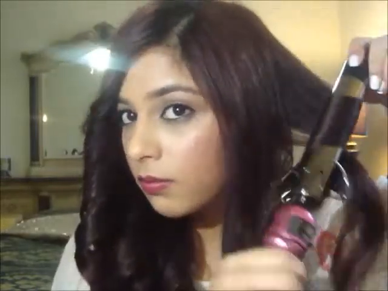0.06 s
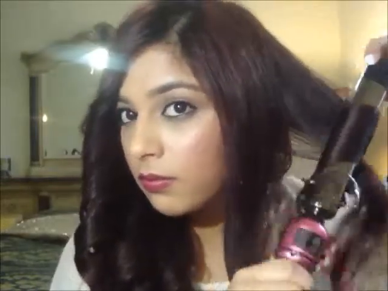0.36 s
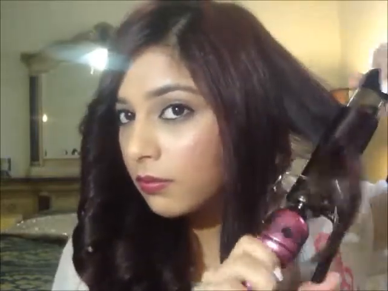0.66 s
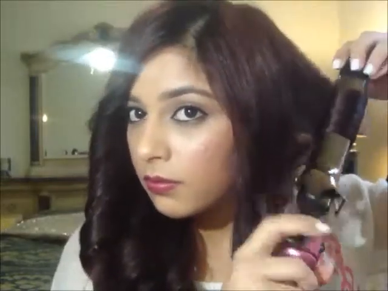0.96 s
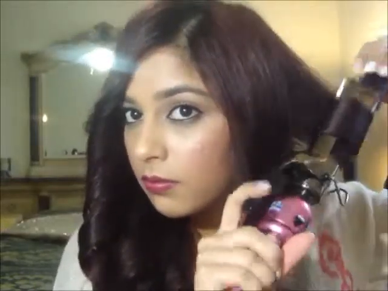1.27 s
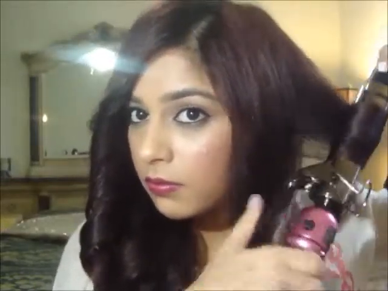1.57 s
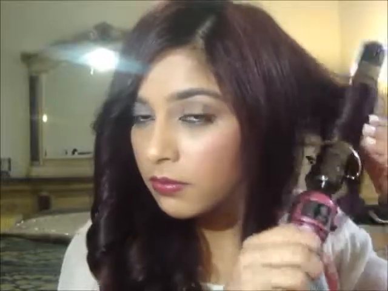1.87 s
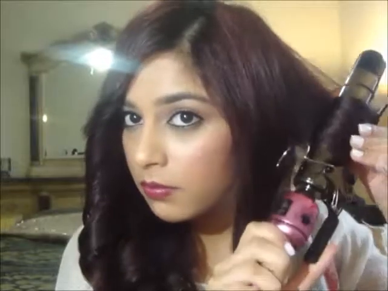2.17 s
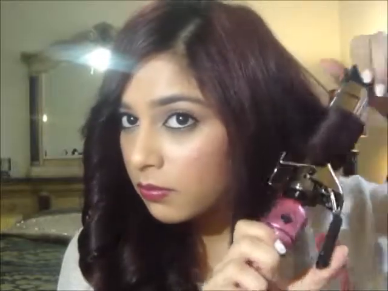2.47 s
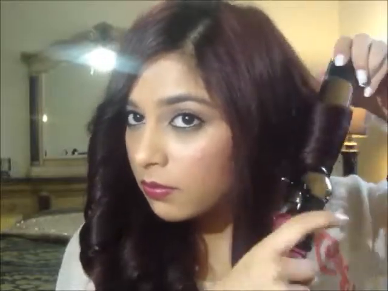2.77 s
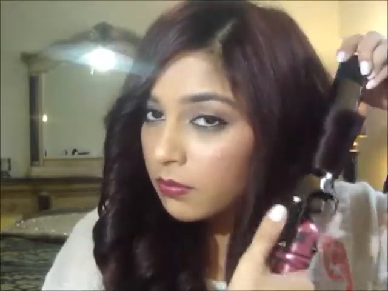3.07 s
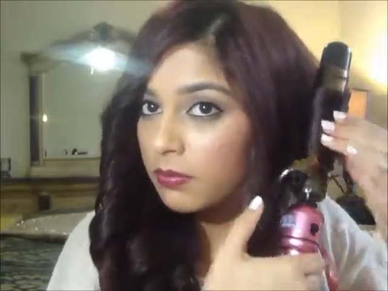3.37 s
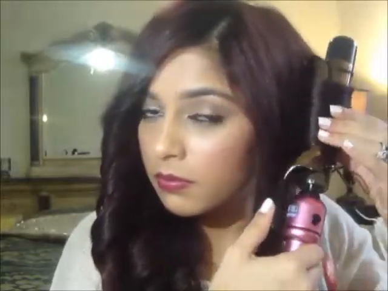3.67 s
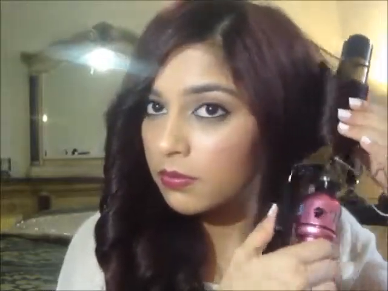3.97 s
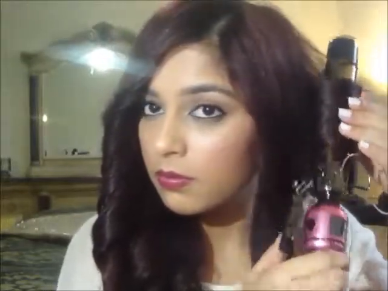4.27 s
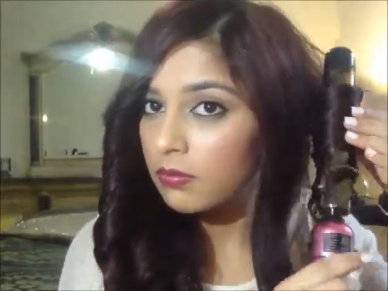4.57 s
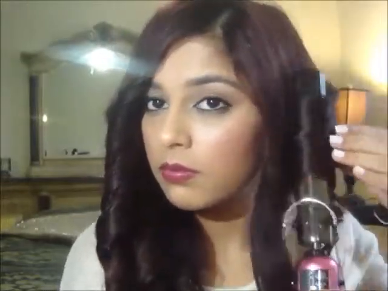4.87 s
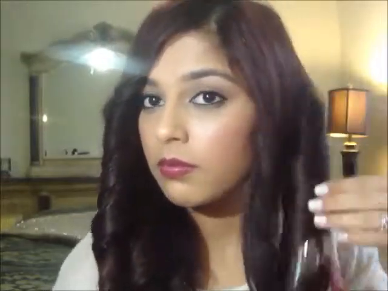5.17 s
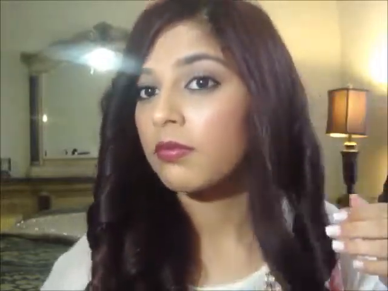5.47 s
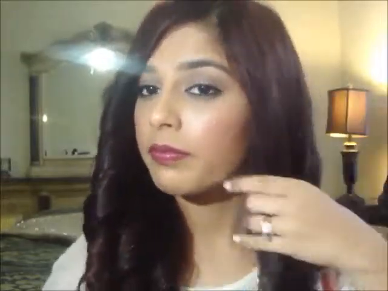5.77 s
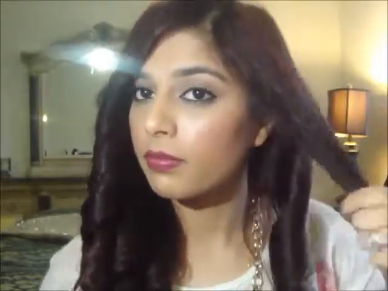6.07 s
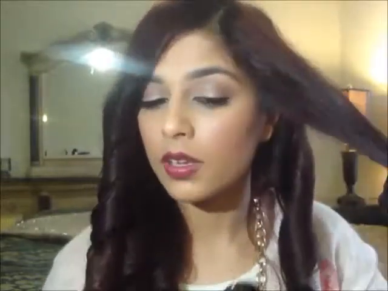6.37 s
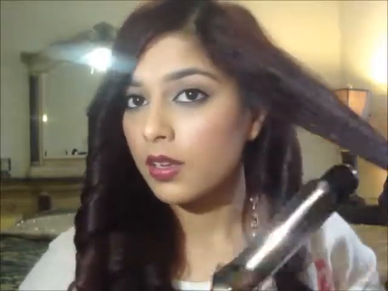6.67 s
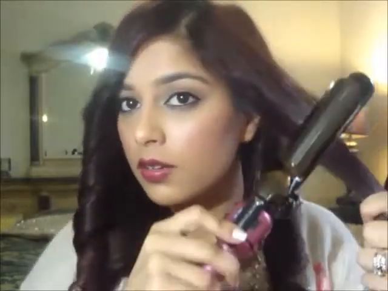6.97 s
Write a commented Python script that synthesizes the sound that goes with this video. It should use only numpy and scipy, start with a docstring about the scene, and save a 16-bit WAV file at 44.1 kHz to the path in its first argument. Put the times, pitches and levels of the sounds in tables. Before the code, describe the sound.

A fan's soft, steady rush and faint microphone hiss fill a quiet room for all seven seconds. During the first second, hair rustles lightly as it is wound on a curling iron. From about 0.3 seconds, the sprung metal clamp gives scattered light ticks and short, thin scrapes against the barrel. These thicken around 1.8 to 2.3 seconds, with a tiny, very high hinge squeak near 2.1. Sparse ticks follow. Between 3.8 and 4.3 seconds come several sharp, brief squeaks, the loudest moments, then quick scrapes and clicks continue until 5.4. At 5.6 the clamp snaps shut with a short, bright ring, and another sharp click lands at 5.8. A last cluster of scrapes and ticks comes around 6.5 to 6.8 seconds. The iron is close to a small stereo microphone, slightly right, and near walls answer briefly.

```python
"""A fan's steady rush and faint microphone hiss in a quiet room, then a light rustle of hair.
It is being wound on a hot curling iron, close to a small stereo microphone and a little to the right.
The sprung metal clamp rubs on the barrel in short scrapes, friction makes its hinge squeak high,
and it ticks and once snaps shut. Near walls answer briefly."""
import sys
import numpy as np
from scipy import signal
from scipy.fft import rfft, irfft, next_fast_len
from scipy.io import wavfile

SR = 44100
rng = np.random.default_rng(int(sys.argv[2]) if len(sys.argv) > 2 else 0)


def master_out(mix):
    """Clip the mix to full scale and print it as 16-bit PCM to the path in sys.argv[1]."""
    frames = np.transpose(np.atleast_2d(mix))
    ceiling = np.clip(frames, -1, 1)
    pcm = np.round(ceiling * 32767).astype(np.int16)
    wavfile.write(sys.argv[1], SR, pcm)


N = 310023
T = np.arange(N) / SR

# The hinge catching and singing: t/s, f/Hz, level/dB, swell/s, hold/s, left minus right/dB,
# lift of the other hinge modes/dB, fullness of the grinding/dB
HINGE_SQUEAKS = [(1.2, 12830, -26.5, 0.0015, 0.0025, -1, -2, 6),
                 (1.985, 12040, -29.5, 0.0014, .002, -4, 0, -2),
                 (2.0686, 14100, -11.5, 0.0026, 0.0034, -7, -10, 0.5),
                 (2.6796, 12450, -27, 0.00044, .0018, -2, 12, -4),
                 (2.7582, 12500, -37.5, .0008, .002, -2, 14, -4),
                 (3.798, 12315, -8.5, 0.0015, 0.0015, -5.5, 0, -9),
                 (3.952, 12370, -8.5, 0.0018, 0.0076, -1.5, -5, -6),
                 (3.968, 12400, -16, 0.0014, .003, 2, 0, -4),
                 (4.116, 12340, -18, 0.0027, 0.0018, -3, 9.5, 4),
                 (4.261, 12360, -9.5, 0.0042, .005, -4, -1, -6),
                 (4.278, 12446, -18.5, 0.0021, .003, -4, 5, 6), (4.957, 12456, -28, .002, .002, -2, 10, 4)]


def amp(db):
    """Decibels to gain."""
    return 10 ** (np.asarray(db) / 20)


def unit(x):
    """Scale to rms 1."""
    return x / np.sqrt(np.mean(x ** 2))


def colour(x, points, bumps=()):
    """Filter by a curve of (f/Hz, level/dB) with bell-shaped peaks or dips (f/Hz, width/Hz, lift/dB)."""
    size = next_fast_len(x.shape[-1])
    f = np.maximum(np.fft.rfftfreq(size, 1 / SR), 1)
    hz, db = np.transpose(points)
    curve = np.interp(np.log(f), np.log(hz), db)
    for centre, width, lift in bumps:
        curve = curve + lift * np.exp(-.5 * ((f - centre) / width) ** 2)
    return irfft(rfft(x, size) * amp(curve), size)[..., :x.shape[-1]]


def fade(t, t60):
    """Free decay, 60 dB in t60 seconds."""
    return np.exp(-np.log(1000) * np.maximum(t, 0) / t60)


def wobble(size, rate):
    """Random drift with spread near 1, changing course rate times a second."""
    return np.interp(T[:size] * rate, np.arange(4096), rng.standard_normal(4096))


def pan(db):
    """Left and right gains for a level difference, left minus right."""
    return amp(np.array([[db], [-db]]) / 2)


def add(track, start, x):
    """Mix a sound into a track from a given time."""
    i = int(start * SR)
    size = min(x.shape[-1], N - i)
    track[..., i:i + size] += x[..., :size]


def microphone_hiss(level_db=-58):
    """The microphone's own even hiss, mostly high treble."""
    noise = rng.standard_normal((2, N))
    return amp(level_db) * unit(colour(noise, [(3000, -37), (14000, -10), (15500, -19)]))


def fan_rush(mid_db=-44.24, side_db=1.85, waver_db=0.86):
    """The fan's diffuse rush fills the room, slightly stronger in the side signal than in the mid."""
    # Room tone: f/Hz, relative level/dB
    room_tone = [(15, -88), (25, -66), (165, -24), (234, -15), (314, -9), (400, -6.5), (539, -6), (705, -2),
                 (764, -1), (1000, -3), (1240, -4.5), (3020, -9.5), (5310, -13.5), (15600, -23.5)]
    # Peaks and a dip on the room tone: f/Hz, width/Hz, lift/dB
    # The rows below 2 kHz are the fan's resonances.
    # The last row is a narrow dip in the hiss near 14 kHz.
    peaks_and_dip = [(240, 10, 4), (361, 46, 3.5), (645, 34, 2), (852, 18, 3), (916, 21, 3.5),
                     (1124, 26, 5.5), (1246, 22, 5.5), (1750, 103, 2), (14100, 120, -4)]
    mid, side = colour(rng.standard_normal((2, N)), room_tone, peaks_and_dip)
    side = colour(unit(side), [(200, 0.66), (800, side_db), (3000, side_db), (8000, 0.97)])
    rush = unit(mid) + side * np.array([[1], [-1]])
    return rush * amp(mid_db + waver_db * wobble(N, rate=4.73))


def fan_motor(gain_db=-2, wander=0.003, flutter_db=2.5):
    """The motor's faint tones wander a little and reach each side by different paths."""
    # Motor tones: f/Hz, level/dB before gain_db
    tones = [(240, -69), (413, -68.5), (748.3, -61), (932, -65.5), (1130, -67), (1266, -66)]
    out = np.zeros((2, N))
    for hz, db in tones:
        turns = np.cumsum(hz * (1 + wander * wobble(N, rate=8.3))) / SR
        for side in range(2):
            peak = np.sqrt(2) * amp(db + gain_db + flutter_db * wobble(N, rate=6))
            out[side] += peak * np.sin(2 * np.pi * (turns + rng.random()))
    return out


def room(x, slap_db=-24, slap_s=.015, size=16000):
    """Head and hands scatter the sound at once, walls a moment later; furniture soon swallows it."""
    # Head and hands, walls, late tail: level/dB, t60/s, delay/s
    reflections = [(-8, 0.059, .0005), (-10, 0.16, 0.007), (-17, 0.28, 0.007)]
    t = T[:size]
    response = np.zeros((2, size))
    for db, t60, delay in reflections:
        echoes = rng.standard_normal((2, size)) * (t > delay) * fade(t - delay, t60)
        response += amp(db) * unit(echoes) / np.sqrt(size)
    # one bare wall sends back a distinct echo
    for side, lag in enumerate(slap_s + 0.0004 * rng.random(2)):
        response[side, int(lag * SR)] += amp(slap_db)
    return x + signal.fftconvolve(x, response, axes=1)[:, :N]


def clamp_ring(force, scatter_db=3.5, detune=0.0054, spread_turns=0.14, size=4096):
    """The metal rings under a force; the place of contact weights its modes."""
    # Modes of clamp and barrel: f/Hz, t60/s, relative level/dB
    modes = [(5500, 0.039, -13), (6540, 0.013, -6), (6880, 0.023, 3.5), (7270, 0.024, -1),
             (7500, 0.022, -7), (8340, 0.025, 1.5), (8570, 0.029, -7), (10140, 0.014, -4.5),
             (10730, 0.035, -8), (11050, 0.029, -1), (11600, 0.027, -4), (12400, 0.027, 4.5),
             (12770, 0.0077, 5.5), (13940, .02, 4), (14440, 0.024, -5)]
    hz, t60, db = np.transpose(modes)[..., None]
    weight, shift, phase, skew = rng.standard_normal((len(modes), 4)).T[..., None]
    t = T[:size]
    turns = hz * (1 + detune * shift) * t + phase
    strength = amp(db + scatter_db * weight) * fade(t, t60) / np.sqrt(t60)
    # each mode radiates a little differently to left and right
    sides = [strength * np.sin(2 * np.pi * (turns + side * spread_turns * skew)) for side in (1, -1)]
    response = unit(np.sum(sides, axis=1)) / np.sqrt(size)
    return signal.fftconvolve(force[None], response, axes=1)[:, :len(force)]


def rub(length, db, body_db, treble_db, spots, bite_db, slips_per_s=11000, grip_db=3, ring_db=-2,
        spot_width_hz=290, glide=0.013, attack_s=0.0024, release_t60=0.0086, size=8000):
    """One stroke: dense uneven slips hiss at the contact and ring the clamp."""
    # Colour of sliding contact: f/Hz, gain/dB
    sliding = [(80, -64), (300, -42), (1200, -42), (2500, -2), (4700, -2.5), (7000, 5), (9500, -0.5),
               (12500, 0), (16000, 3.5)]
    t = T[:size]
    # lighter at both ends, the more so where the metal rings
    ease_db = 0.5 + 0.3 * max(lift for _, lift in spots)
    pressure_db = np.interp(t, [0, 0.44 * length, length], [-ease_db, 0, -ease_db])
    # the stroke breaks loose with a jerk, or eases in where bite_db is negative
    pressure_db += bite_db * fade(t, t60=0.052)
    touch = np.clip(t / attack_s, 0, 1) * fade(t - length, release_t60)
    slips = unit((rng.random(size) < slips_per_s / SR) * rng.standard_normal(size))
    force = slips * touch * amp(pressure_db + grip_db * wobble(size, rate=300))
    contact = colour(force, sliding) + amp(ring_db) * clamp_ring(force)
    # bare metal is thin and bright, hair between the jaws makes it duller
    tone = [(1500, 0), (3000, body_db), (4800, body_db), (6300, 0), (8700, 0),
            (10500, treble_db / 2), (13000, treble_db)]
    # the resonances slide up or down as the point of contact travels
    shift = glide * rng.choice([-1, 1])
    first, last = (colour(contact, tone, [(hz * ratio, spot_width_hz, lift) for hz, lift in spots])
                   for ratio in (1 - shift, 1 + shift))
    travel = np.clip(t / length, 0, 1)
    sound = first * (1 - travel) + last * travel
    # the level holds for the time of contact
    return amp(db) * unit(sound) * np.sqrt(np.mean(touch ** 2))


def hair_rustles(gap_s=0.03, length_s=0.0048, scatter_db=2, low_hz=6800, high_hz=10000, lift_db=13):
    """While hair is fed through, tiny catches follow each other unevenly, each at a spot of its own."""
    # Hair sliding under the clamp and through the fingers: from t/s, to t/s, level/dB
    feeds = [(0.079, .31, -48), (.46, .53, -48), (0.731, .76, -43), (1.0, 1.05, -49)]
    out = np.zeros((2, N))
    for start, end, db in feeds:
        slots = np.arange(start, end, gap_s)
        for at, (late, long, hard, spot) in zip(slots, rng.random((len(slots), 4))):
            spot_hz = low_hz + spot * (high_hz - low_hz)
            catch = rub(length_s * (.5 + long), db + scatter_db * (2 * hard - 1),
                        body_db=3, treble_db=-2, spots=[(spot_hz, lift_db)], bite_db=3)
            add(out, at + late * gap_s / 2, catch)
    return out


def clamp_clicks(contact_s=0.00022, crack_db=-4, body_db=-11, pivot_hz=8200, ping_cycles=90, size=8000):
    """A knock is a crack, duller through hair, a ping of the part hit and a faint ring of the clamp."""
    # Clamp and spring knocking: t/s, level/dB, ping f/Hz, ping gain/dB, crack tilt/(dB per octave)
    knocks = [(0.348, -34, 7300, 3, -2), (0.933, -25.5, 5730, -11, -7), (1.4527, -33, 5770, -4, -8),
              (1.784, -20.5, 13700, 5, 6), (1.912, -25, 7300, -4, -2), (2.071, -18, 2840, -20, 2),
              (2.1764, -24, 9800, -5, -5), (2.32, -25.5, 8350, -4, -3), (2.7095, -38, 5550, 0, -6),
              (2.714, -27, 3600, -14, -3), (3.0375, -25.5, 5600, -16, -1), (3.094, -27, 12300, -12, -1),
              (3.288, -27, 6100, -9, -8), (3.8825, -29, 12400, -8, 1), (3.942, -27, 8200, -6, 4),
              (4.107, -19, 7200, -8, -3), (4.4547, -31, 7400, -2, -1), (4.5912, -32, 7150, -3, 0),
              (4.6895, -35, 12700, -3, -2), (4.7236, -34, 7300, -3, 0), (4.8623, -29, 13600, -5, -1),
              (4.8738, -28, 13700, -3, -1), (4.955, -33, 2064, 1, -1), (5.037, -32, 8400, -6, 0),
              (5.163, -29, 8400, -4, -5), (5.173, -31, 1925, -1.5, -4), (5.219, -29, 12700, -3, 0),
              (5.32, -32, 2020, -3.5, 2), (5.6144, -15.5, 3430, -15, 0), (5.6162, -20, 7320, 2.5, 2),
              (5.651, -30, 12900, -3, 4), (5.813, -19.5, 4754, -5, 2), (5.8132, -14, 12700, -4, 1),
              (6.535, -28.5, 7100, -1, -3), (6.578, -37, 3030, 1, -2), (6.586, -37, 2880, 1, -2),
              (6.654, -34, 8250, -2, -4), (6.663, -30, 8250, -4, -5), (6.677, -27, 6900, -1, -10)]
    # Colour of a knock: f/Hz, gain/dB
    knock_colour = [(30, -35), (150, -36), (1000, -25), (3000, -9), (5000, -3), (7000, 6.5), (12000, 5.5),
                    (16000, 6)]
    out, lead_s = np.zeros((2, N)), .01
    t = np.maximum(T[:size] - lead_s, 0)
    push = t / contact_s * np.exp(1 - t / contact_s)
    for at, db, hz, ping_db, tilt_db in knocks:
        force = amp(crack_db) * push * rng.choice([-1, 1], size)
        crack = colour(force, knock_colour) + amp(body_db) * clamp_ring(force)
        tilt = [(f, tilt_db * np.log2(f / pivot_hz)) for f in (3000, 14000)]
        # every ping lasts the same number of cycles, so low ones ring longest
        ping = (1 - np.exp(-t / contact_s)) * fade(t, ping_cycles / hz) * np.sin(2 * np.pi * hz * t)
        add(out, at - lead_s, amp(db) * (colour(crack, tilt) + amp(ping_db) * ping))
    return out


def clamp_snap(at_s=5.6144, gain_db=-29.5, burst_db=16, burst_t60=.012, contact_s=.0002,
               spread_turns=.08, size=10000):
    """The clamp springs shut: the barrel's modes burst out, are damped by the jaw and beat on faintly."""
    # Modes of the bare barrel when the clamp lands flat on it: f/Hz, t60/s, relative level/dB
    barrel_modes = [(7280, .09, -11), (8372, .08, -19), (10780, .1, -5), (10840, .09, 1.5),
                    (11390, .07, -8), (11595, .09, -5), (12400, .06, -13), (14160, .06, -9),
                    (14360, .06, -11)]
    out, t = np.zeros((2, N)), T[:size]
    envelope = (1 - np.exp(-t / contact_s)) * (1 + amp(burst_db) * fade(t, burst_t60))
    for hz, t60, db in barrel_modes:
        phase = rng.random() + spread_turns * rng.standard_normal((2, 1))
        ring = fade(t, t60) * np.sin(2 * np.pi * (hz * t + phase))
        add(out, at_s, amp(gain_db + db) * envelope * ring)
    return out


def hinge_grinding(before_s=0.0049, after_s=0.0073, spot_hz=8540, lift_db=6):
    """The hinge grinds as it takes up the load for each squeak, longer if that swells slowly."""
    out = np.zeros((2, N))
    for at, _, squeak_db, swell, _, _, _, body_db in HINGE_SQUEAKS:
        lead_s = before_s + 3.6 * swell
        db = -27 + 0.5 * squeak_db
        grind = rub(lead_s + after_s, db, body_db, treble_db=1.5, spots=[(spot_hz, lift_db)], bite_db=0)
        add(out, at - lead_s, grind)
    return out


def hinge_squeaks(gain_db=1, stop_t60=0.01, ring_db=-19, ring_t60=0.125, rasp_db=-16, scatter_db=1,
                  waver=0.0031, partner_waver=0.0082, detune=0.004, spread_turns=0.091, size=10000):
    """Friction pumps one hinge mode: it swells, holds for a moment, is choked and rings on faintly."""
    # Hinge modes that every squeak drags along: f/Hz, relative level/dB
    partners = [(8320, -34), (10170, -22), (10450, -25.5), (11720, -28), (12480, -19), (12970, -28),
                (13800, -24), (14480, -15)]
    out, lead_s = np.zeros((2, N)), .03
    t = T[:size] - lead_s
    for at, hz, db, swell, hold, pan_db, partners_db, _ in HINGE_SQUEAKS:
        growth = np.exp(np.minimum(t, 0) / swell)
        driven = fade(t - hold, stop_t60)
        envelope = growth * np.maximum(driven, amp(ring_db) * fade(t - hold, ring_t60))
        # the two sides of the microphone hear the hinge from different angles
        phases = spread_turns * rng.standard_normal((len(partners) + 1, 2, 1))
        pitch = hz * (1 + waver * wobble(size, rate=350))
        tone = np.sin(2 * np.pi * (np.cumsum(pitch) / SR + phases[0]))
        # the load on the hinge weights and detunes its other modes anew each time
        loads = rng.standard_normal((len(partners), 2))
        for (mode_hz, mode_db), phase, (weight, shift) in zip(partners, phases[1:], loads):
            pitch = mode_hz * (1 + detune * shift + partner_waver * wobble(size, rate=350))
            strength = amp(mode_db + partners_db + scatter_db * weight)
            tone += strength * np.sin(2 * np.pi * (np.cumsum(pitch) / SR + phase))
        # uneven slips roughen the tone while the contact drives it
        rasp = 1 + amp(rasp_db) * driven * wobble(size, rate=2600)
        add(out, at - lead_s, pan(pan_db) * amp(db + gain_db) * envelope * rasp * tone)
    return out


def clamp_scrapes(usual_s=0.052):
    """The clamp slides on the barrel; each spot has its own pair of resonances and brightness."""
    # Strokes along the barrel: t/s, length/s, level/dB, lower resonance f/Hz, its lift/dB,
    # upper resonance f/Hz, its lift/dB, treble/dB, opening jerk/dB
    strokes = [(0.347, 0.02, -48, 7250, 15, 13300, 3, 2, 7), (0.437, .008, -47, 7350, 10, 13300, 5, -3, 0),
               (0.576, .022, -48, 7300, 5, 12000, 4, 1, 0), (0.777, .028, -50, 5570, 15, 9600, 13, -6, 0),
               (1.119, 0.04, -43.5, 7500, 0, 12400, 5, 0, 4),
               (1.261, 0.029, -40, 7650, 8, 15200, 3, -3, -5), (1.277, .008, -36, 6750, 6, 13600, 5, 0, 0),
               (1.332, 0.014, -43, 8300, 5, 13500, 4, 0, 3),
               (1.786, 0.075, -46.5, 7560, 12, 12500, 3, 1, 8),
               (1.91, 0.0084, -35, 7350, 14, 10700, 3, -5, 9),
               (1.968, 0.044, -35, 7400, 2, 12500, 7, -1.5, -4),
               (1.982, .012, -32.5, 7500, 4, 12700, 6, 4, 5),
               (2.187, 0.048, -40.5, 7300, 1, 12600, 3, -2.5, 5),
               (2.286, 0.04, -37, 8400, 4, 12500, 1, -1, 3), (3.634, .017, -45, 8350, 9, 12700, 5, 1, 3),
               (3.675, .022, -47.5, 8850, 14, 11100, 6, -4, 0),
               (3.702, 0.053, -44, 7900, 0, 13900, 7, -7, 0), (3.832, 0.065, -40, 8300, 5, 14200, 4, 0, 7),
               (3.989, 0.072, -35.5, 8250, 8, 14000, 2, 3.5, 0),
               (4.004, 0.013, -30, 8300, 6, 13900, 10, 6, 4),
               (4.145, 0.048, -37.5, 7350, 6, 12500, 4, 0, 2),
               (4.427, 0.058, -41, 7370, 16, 13500, 2, 0, -7),
               (4.538, 0.021, -41.5, 7150, 7, 13600, 3, -2, 5),
               (4.588, 0.043, -38.5, 7250, 11.5, 12600, 0, -5, 8),
               (4.682, 0.019, -40, 8200, 5, 12700, 7, -7, 3),
               (4.721, 0.052, -40, 7400, 9, 13500, 9, -5, 11), (4.861, .007, -34, 7600, 6, 13600, 12, 0, 4),
               (4.867, .034, -36, 7500, 2, 13700, 8, -4, 9), (4.948, 0.014, -35, 8250, 4, 13850, 7, -1, 0),
               (4.986, .009, -33.5, 8400, 2, 15000, 6, 7, 4),
               (4.995, 0.047, -42.5, 8400, 4, 12750, 4, -1.5, 4),
               (5.148, 0.011, -42, 8300, 3, 12600, 3, -3, 0), (5.162, 0.021, -34, 8340, 2, 12600, 3, -7, 3),
               (5.214, 0.043, -36, 8550, 3, 12600, 4, -1.5, 9),
               (5.313, 0.015, -31, 8070, 12, 11000, 9, -5, 1),
               (5.363, 0.026, -33, 8530, 14.5, 12600, 4, -2, 6),
               (5.594, 0.016, -31, 8100, 8, 12700, 7, 2, 5), (5.62, 0.035, -38, 8500, 4, 14200, 5, 7, 5),
               (6.01, 0.033, -50.5, 6000, 7, 9500, 10, -5, 0),
               (6.534, 0.051, -37.5, 7000, 5, 11080, 18, -6, 0),
               (6.573, 0.024, -28, 8350, 7, 13300, 6, -4, 5), (6.577, .018, -35, 6550, 2, 11080, 18, -4, 0),
               (6.636, 0.048, -40, 6900, 4, 8250, 3, -12, 2), (6.695, 0.037, -49, 6500, 4, 11500, 8, -4, 0),
               (6.754, .018, -49, 6200, 7, 11000, 5, -3, 0)]
    out = np.zeros((2, N))
    for start, length, db, low_hz, low_db, high_hz, high_db, treble_db, bite_db in strokes:
        body_db = 2 + 7 * np.log2(length / usual_s)  # long strokes drag more hair and sound fuller
        spots = [(low_hz, low_db), (high_hz, high_db)]
        add(out, start, rub(length, db, body_db, treble_db, spots, bite_db))
    return out


def scene():
    """The iron is held close, a little to the right of the microphone, with the fan's rush all round."""
    handling = clamp_scrapes() + hair_rustles() + hinge_grinding() + clamp_clicks() + clamp_snap()
    iron = pan(-0.42) * handling + hinge_squeaks()
    return room(iron) + fan_rush() + microphone_hiss() + fan_motor()


def record(dry):
    """The recorder cuts the very top."""
    top_hz = 15700
    return signal.sosfilt(signal.ellip(10, .2, 80, top_hz, fs=SR, output="sos"), dry)


dry = scene()
out = record(dry)
master_out(out)
```